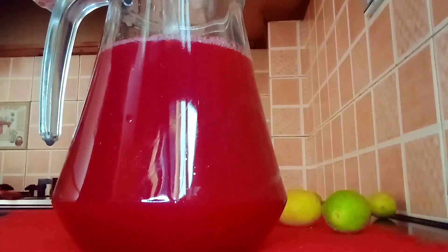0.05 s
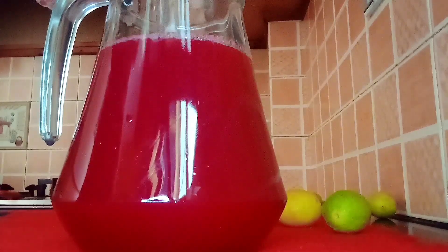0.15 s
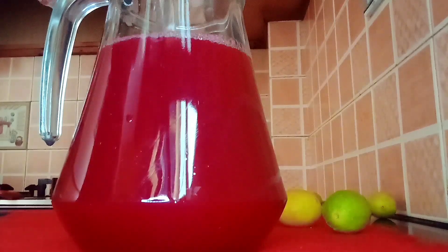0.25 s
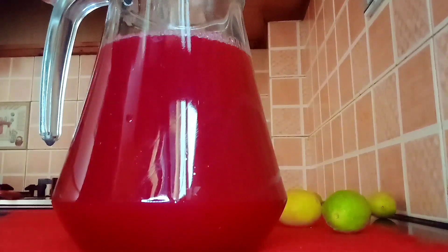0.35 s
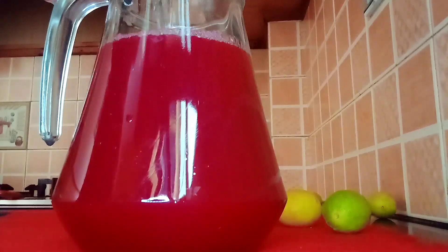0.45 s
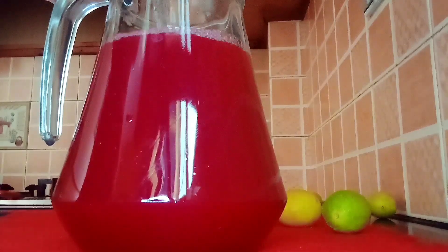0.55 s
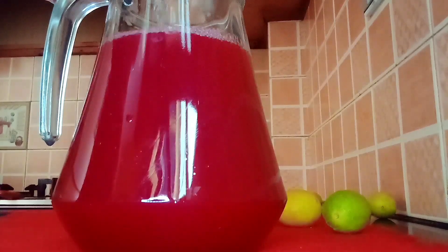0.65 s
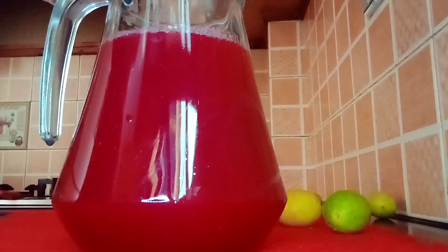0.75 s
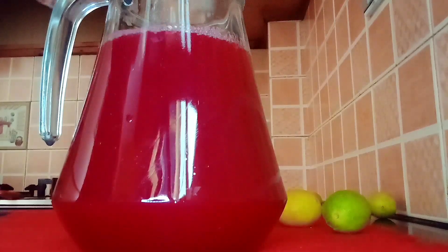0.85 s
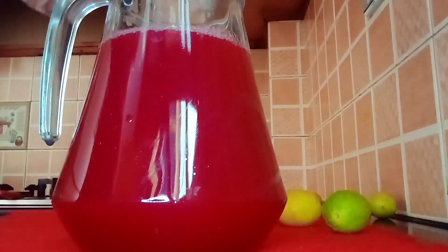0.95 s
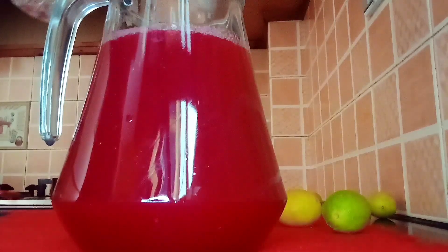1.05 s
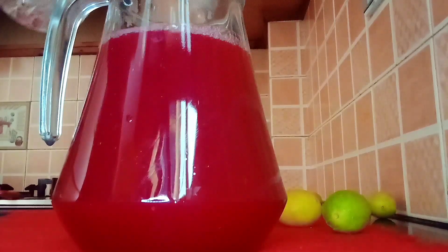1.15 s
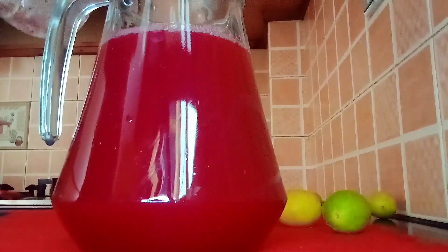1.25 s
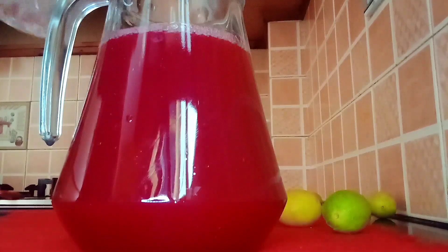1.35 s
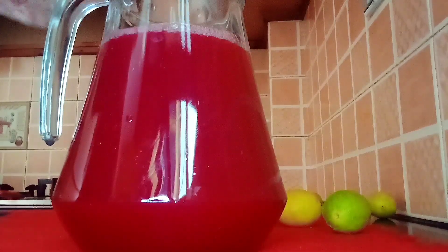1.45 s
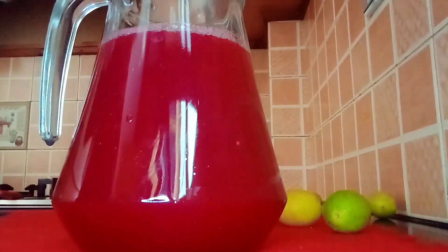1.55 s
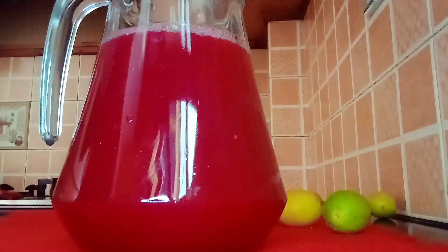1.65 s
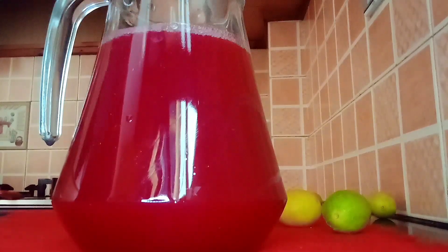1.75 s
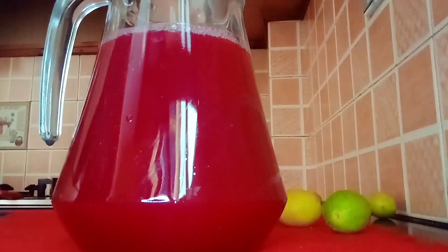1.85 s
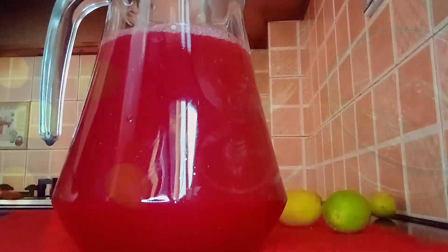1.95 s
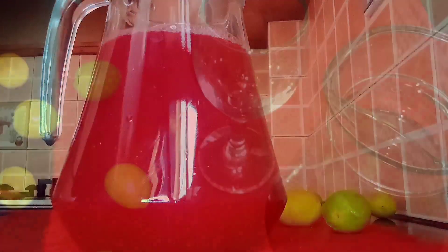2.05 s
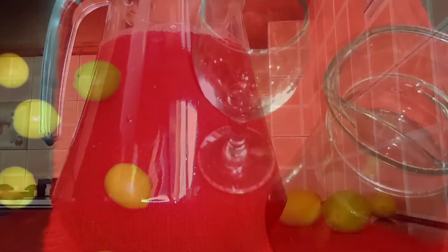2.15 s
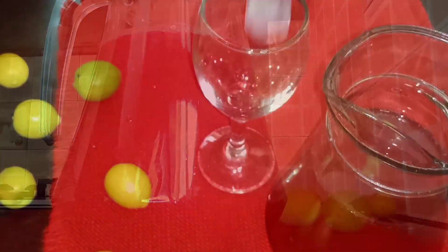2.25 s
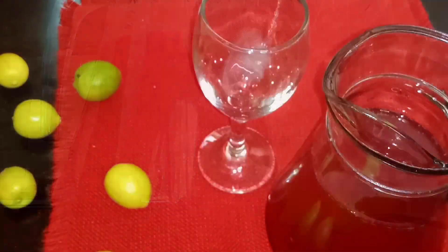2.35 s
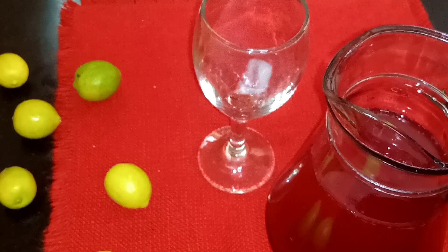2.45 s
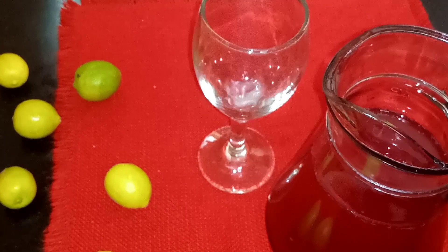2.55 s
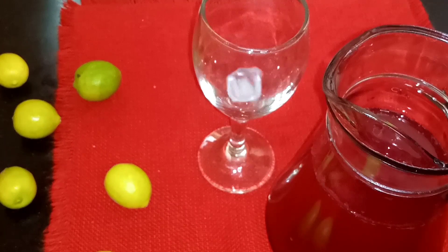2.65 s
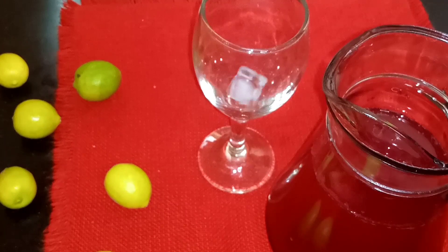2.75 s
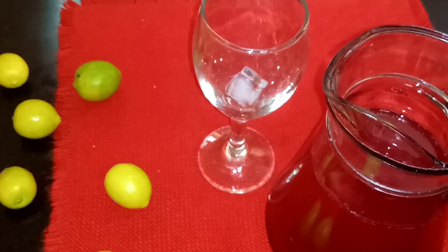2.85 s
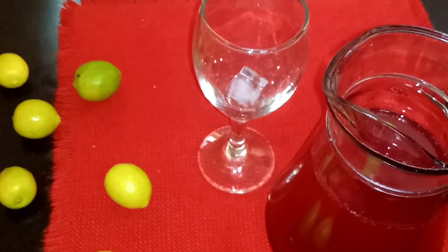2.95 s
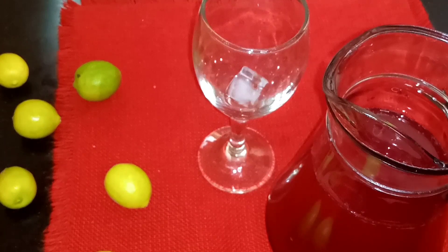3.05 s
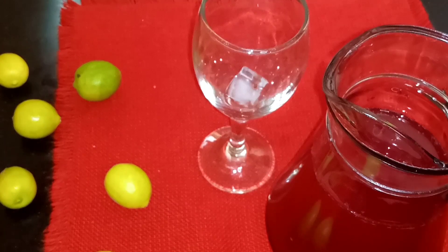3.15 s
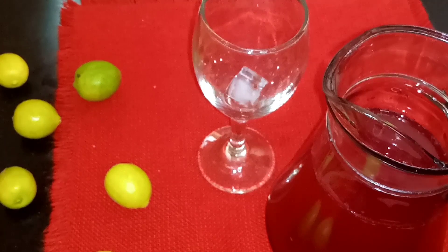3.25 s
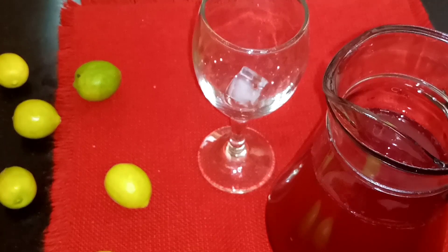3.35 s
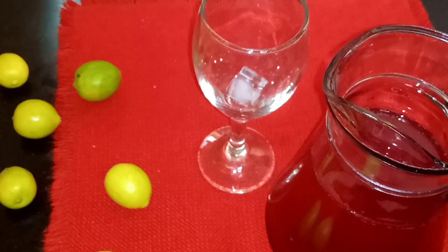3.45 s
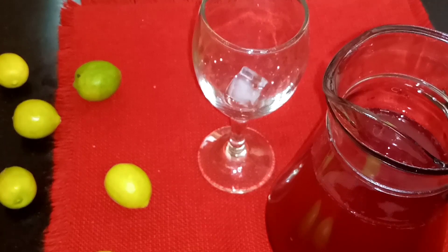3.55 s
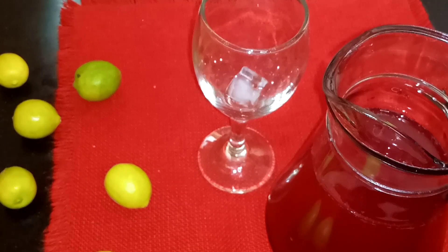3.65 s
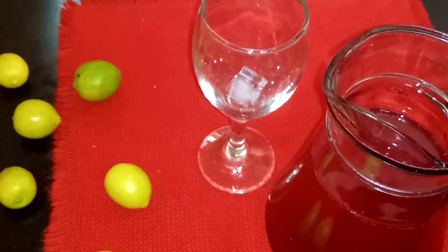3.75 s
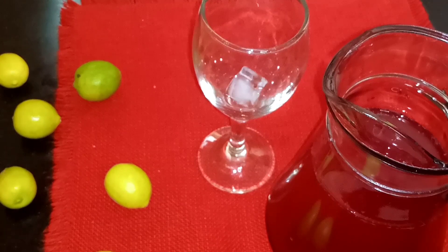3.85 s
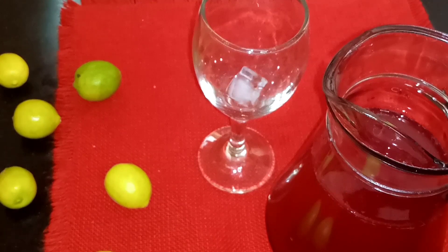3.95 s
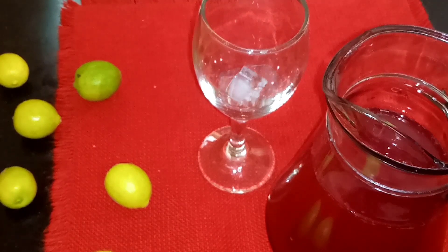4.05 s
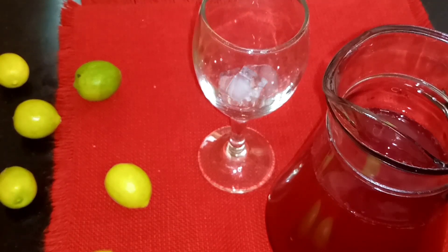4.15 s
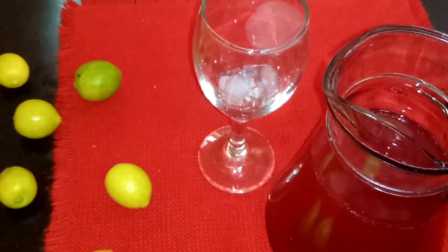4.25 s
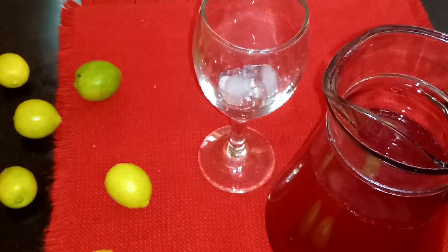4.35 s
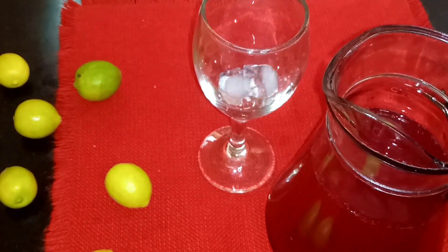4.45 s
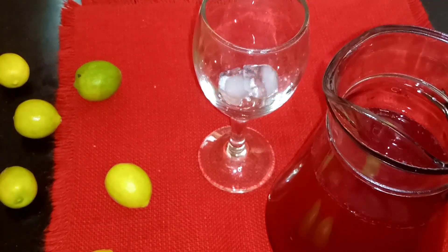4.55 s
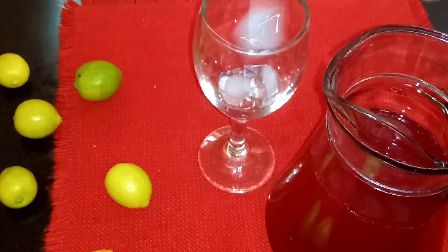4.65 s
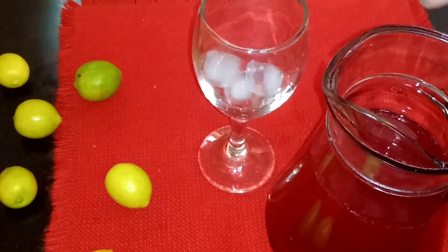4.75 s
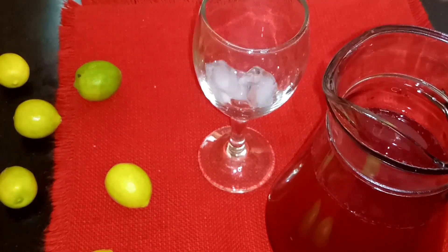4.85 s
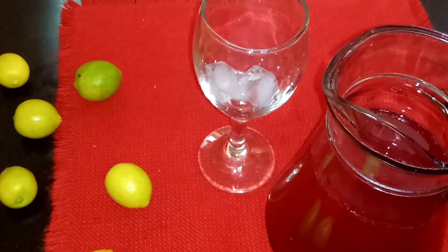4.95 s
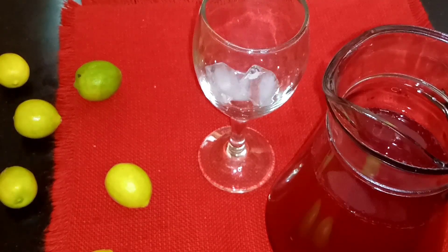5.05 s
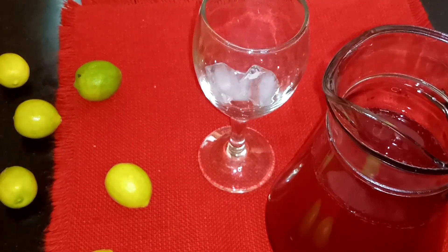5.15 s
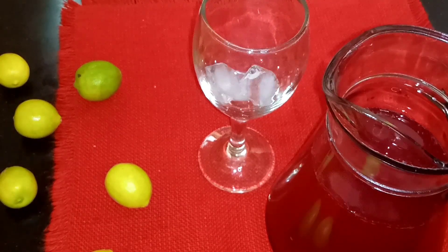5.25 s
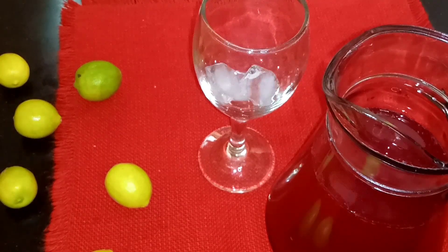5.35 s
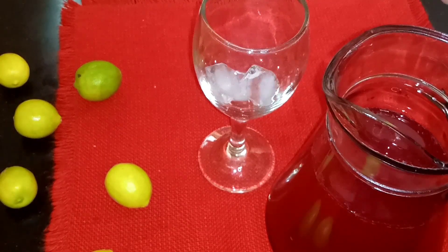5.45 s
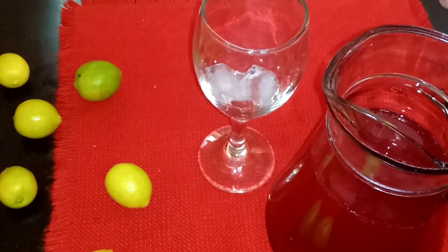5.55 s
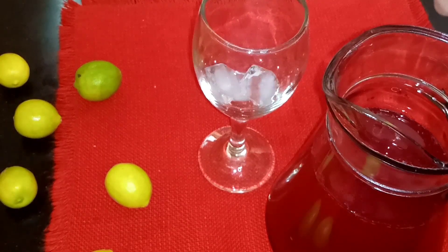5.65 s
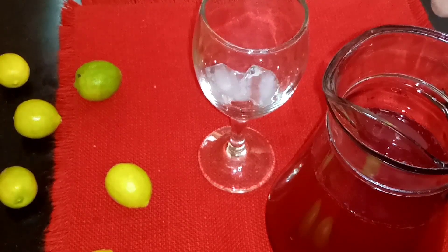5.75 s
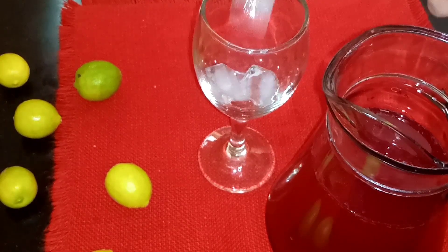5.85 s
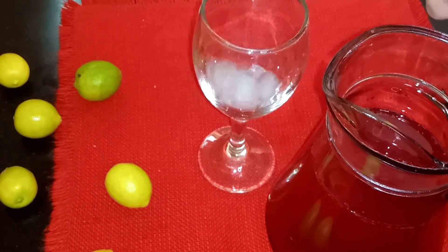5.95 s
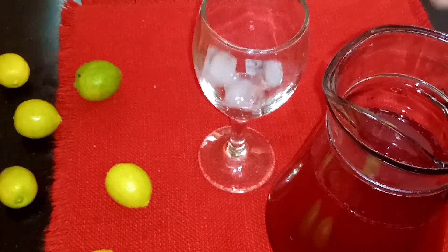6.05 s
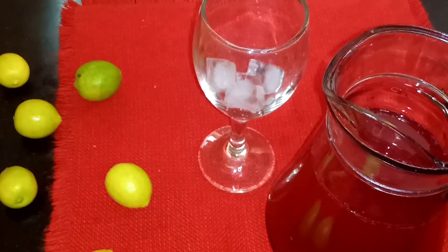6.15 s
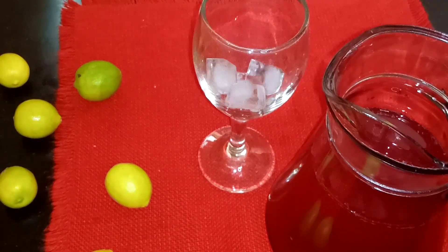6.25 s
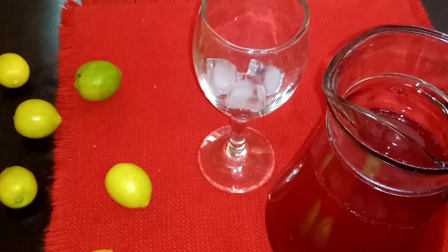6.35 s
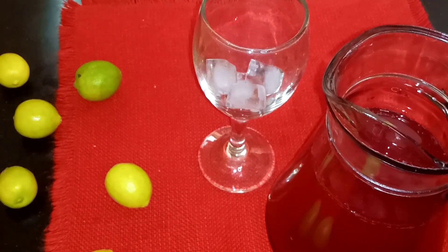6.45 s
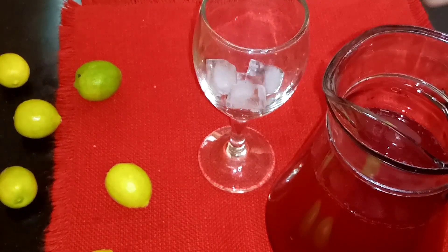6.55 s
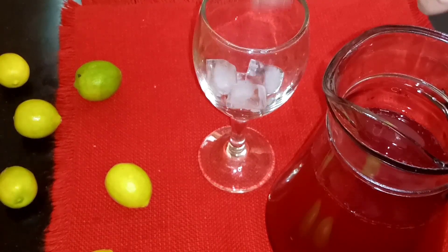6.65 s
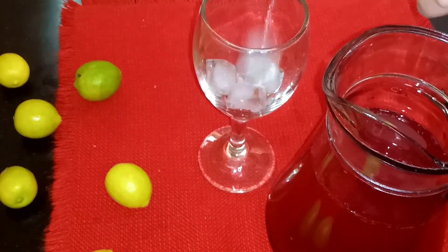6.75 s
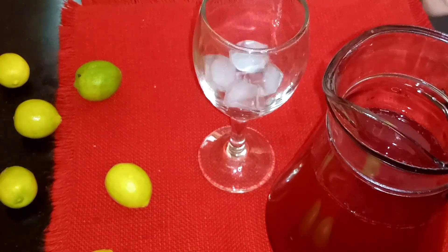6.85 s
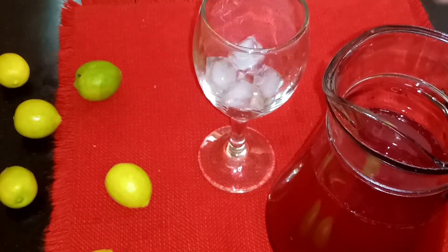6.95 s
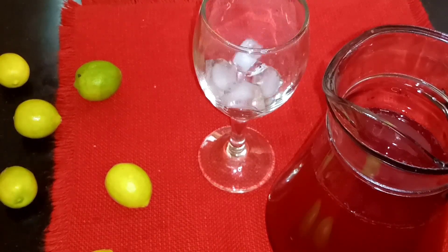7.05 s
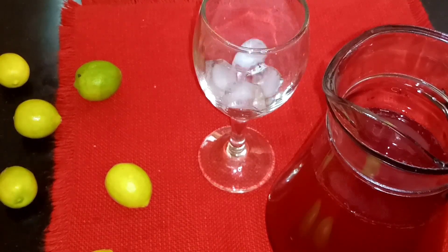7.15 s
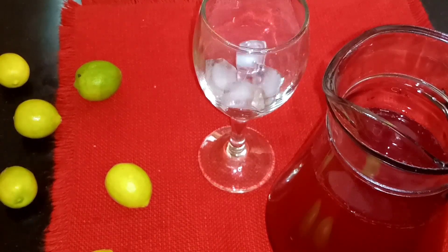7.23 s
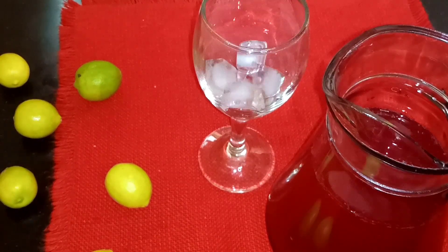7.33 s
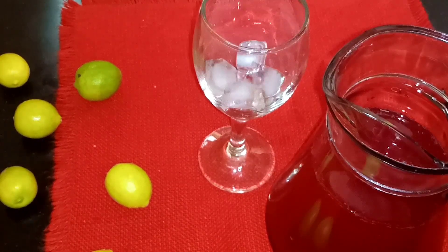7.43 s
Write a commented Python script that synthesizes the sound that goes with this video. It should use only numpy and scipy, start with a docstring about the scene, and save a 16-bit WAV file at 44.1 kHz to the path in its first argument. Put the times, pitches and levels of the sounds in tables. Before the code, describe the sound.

A close, clear kitchen scene with very quiet air and short, bright reflections from tiles. From about 0.2 s juice runs into a nearly full glass pitcher: round, mid-pitched bubbles gurgle in quick succession, thin spray hisses and spatters, and a faint hum climbs as the neck fills. The flow eases near 0.9 s, surges around 1.1 s and dies by 1.4 s. Near silence follows, with faint nudges near 1.9 s. At 2.3 s an ice cube strikes the stemmed glass, bouncing in hard, ringing clicks to 2.65 s, with smaller knocks around 3 s. More cubes clatter at 4.2-4.3 s, the ring cutting off abruptly near 4.4 s, then at 4.6-4.85 s. Lighter ticks and slides come at 5.1-5.7 s, strong cracks at 6.0 and 6.8 s, and small settling clinks until about 7.5 s. Barely audible dull thuds lie beneath.

```python
"""Juice is heard first, running into a nearly full glass pitcher: entrained air sings as bubbles,
spray spatters as short grains, and a tone rises in pitch as the air space in the neck shrinks.
Ice cubes then drop one by one into a stemmed glass: brittle clicks, decaying modes of the bowl,
and runs of tiny ticks as they slide to rest. Soft thuds, nudges and faint hollow tones lie beneath.
Tiled walls add diffuse reflections, and a limiter catches the hardest hits."""
import sys
import numpy as np
from scipy import signal
from scipy.fft import rfft, irfft, next_fast_len
from scipy.io import wavfile
from scipy.ndimage import uniform_filter1d, minimum_filter1d

SR = 44100
rng = np.random.default_rng(int(sys.argv[2]) if len(sys.argv) > 2 else 0)


def generate_wav(signal):
    """Clip the signal to [-1, 1] and save it as 16-bit WAV at the path in sys.argv[1]."""
    frames = np.transpose(np.atleast_2d(signal))
    scaled = np.clip(frames, -1, 1) * 32767
    pcm = np.round(scaled).astype(np.int16)
    wavfile.write(sys.argv[1], SR, pcm)


N = 330304
TIME = np.arange(N) / SR

# All levels are relative: each source and its reflections scale them further.
# Spectrum of the quiet kitchen air: [f/Hz, level/dB]
KITCHEN_COLOUR = [(25, -26.5), (50, -10), (95, 0), (300, -7), (600, -14.5), (1300, -17.5), (3000, -18.5),
                  (6200, -15.5), (9000, -23), (16000, -34)]
# Dull thuds: [t/s, level/dB, f/Hz, length/s]
THUDS = [(4.29, -44.5, 152, 0.065), (4.76, -40.5, 134, 0.081), (5.54, -44, 151, 0.069),
         (5.65, -43.5, 86, 0.091), (6.05, -42, 149, 0.17), (6.23, -37.5, 85.5, 0.097),
         (6.66, -43.5, 91, .1), (6.97, -46, 114.7, 0.069), (7.33, -41, 212, 0.17)]
# Faint hollow tones: [t/s, level/dB, f/Hz, length/s]
HOLLOW_TONES = [(3.18, -54.5, 398, 0.15), (3.34, -56, 760, 0.138), (3.42, -56.5, 381, 0.079),
                (6.44, -53, 607, 0.32)]

# The stream swells, eases, surges once more and stops, leaving foam:
# [t/s, bubbling level/dB, spray level/dB]
POUR_LEVELS = [(0, -52.5, -54), (.29, -44.5, -49.5), (.33, -30.5, -46.5), (.44, -34, -39),
               (.6, -25.5, -41.5), (.85, -32.5, -35), (1.0, -36, -38), (1.17, -26.5, -43.5),
               (1.37, -60, -60.5), (1.9, -100, -80)]
# Air resonance in the neck of the pitcher: [t/s, f/Hz, level/dB]
NECK_RESONANCE = [(0, 310, -83), (.3, 315, -76), (.45, 322.5, -46.5), (.8, 333.3, -45), (1.05, 373.7, -40),
                  (1.2, 418, -60), (1.35, 430.6, -86)]
# Big single bubbles: [t/s, level/dB, f/Hz]
BIG_BUBBLES = [(.211, -27, 913), (.318, -23.5, 904), (.403, -15, 873), (.434, -15.5, 834),
               (.564, -13.5, 790), (.584, -15, 816), (.604, -14, 792), (.620, -11.5, 758), (.656, -12, 798),
               (.730, -12.5, 793), (.811, -13, 877), (.875, -19, 1790), (.882, -24, 2060),
               (.995, -13.5, 6545), (1.025, -8.5, 796), (1.061, -13.5, 813), (1.065, -21.5, 2670),
               (1.131, -13.5, 839), (1.195, -18.5, 780), (1.220, -29, 537), (1.288, -25.5, 920),
               (1.447, -48.5, 880)]
# Spectrum of the small bubbles: [f/Hz, level/dB]
BUBBLING_COLOUR = [(400, -38), (560, -15.5), (680, -10), (800, 6), (960, -2.5), (1230, -14), (1450, -8),
                   (2100, -39.5), (2600, -16)]
# Spectrum of the spray: [f/Hz, level/dB]
SPRAY_COLOUR = [(1060, -17.5), (1800, -16), (2280, -17), (2640, -17), (4250, -14), (5100, -5.5),
                (5800, -10), (6710, -0.5), (7770, -11), (8670, -4), (12200, -16.5), (16000, -2.5)]
# Splashes of the stream: [t/s, level/dB]
SPLASHES = [(0.060, -36.5), (0.125, -35.5), (0.21, -37.5), (0.404, -35), (0.429, -27), (0.527, -21.5),
            (.675, -29), (0.749, -29.5), (.875, -36), (1.131, -32)]
SURGE_DB, SURGE_HZ = 2, 14  # rms wavering of the stream, and the rate where it is strongest
GLUG_CYCLES, GLUG_GLIDE = 66, .025  # cycles to fall 60 dB, and the rise-in-pitch coefficient

# Spectrum of ice cracks and scrapes: [f/Hz, level/dB]
ICE_COLOUR = [(350, -66.5), (600, -27), (894, -12), (1050, -17), (1350, -9.5), (1930, -12), (3040, -6),
              (4110, -4.5), (5630, -9.5), (6830, -8), (7830, -21), (8990, -18.5), (13600, -46.5),
              (16000, -30)]
# The clearest ice clicks: [t/s, level/dB, cube resonance f/Hz, body level/dB, top level/dB]
ICE_CLICKS = [(2.221, -34, 3680, -8, -7), (2.2527, -26.5, 3720, -16, -22), (2.3348, 1.5, 6340, -6.5, -16),
              (2.437, 1.5, 3240, -29, -9), (2.5744, -5.5, 5850, -35, -22), (2.582, 0.5, 6660, -35, -23),
              (2.6439, -1, 5360, -38, -24.5), (2.8669, -21, 4180, -40, -14), (2.992, -3.5, 3120, -3, -5),
              (3.013, -12, 3882, -22, -34), (3.0876, -12, 3850, -21.5, -21.5),
              (3.9694, -13.5, 4420, -21, -30.5), (4.137, -17, 3600, -19, -20), (4.1907, -3, 3990, -27, -20),
              (4.2331, 3.5, 4240, -23, -7), (4.2966, 1, 3560, -13.5, -3.5), (4.4583, -19.5, 4270, -22, -8),
              (4.5673, -21.5, 4550, -21.5, -12), (4.599, 1.5, 4330, -20.5, -0.5),
              (4.7137, -0.5, 6456, -5, -23), (4.801, -2.5, 3790, -25.5, -38.5),
              (4.8373, -7, 3300, -23.5, -13), (5.1486, -19.5, 4510, -20, -5), (5.3487, -10, 6860, -42, -29),
              (5.4141, -13.5, 4000, -21, -5), (5.5063, -11.5, 4230, -12, -17),
              (5.6848, -20, 5870, -25, -22.5), (5.874, -9.5, 6340, -19.5, -17),
              (5.9017, -14.5, 4166, -15, -18), (5.9911, 4.5, 3730, -22.5, -30),
              (6.012, -1.5, 6010, -14, -7), (6.1019, -8, 3720, -24.5, -43), (6.2542, -9, 6400, -17, -5.5),
              (6.3592, -16.5, 4170, -19, -31), (6.3789, -14.5, 4340, -21, -12.5),
              (6.453, -22.5, 4140, -9, -6), (6.542, -11, 4090, -23.5, -7), (6.6173, -17.5, 6502, -5, -2),
              (6.8089, 5.5, 6030, -15.5, -15.5), (6.8798, 3.5, 4320, -29.5, -23),
              (7.012, -8.5, 3450, -12, -15), (7.0778, -11.5, 3530, -26, -20.5),
              (7.257, -11.5, 6830, -25, -16), (7.3191, -18, 3150, -43.5, -14),
              (7.364, -16.5, 4500, -30, -3), (7.3975, -10.5, 4400, -17.5, -9),
              (7.4325, -10, 6830, -31, -22), (7.4704, -10, 4400, -13, -9)]
# Blows on the bowl; where a cube lands sets what rings: [t/s, air in the bowl level/dB,
# first, second, third wall mode level/dB, highest modes level/dB]
BOWL_BLOWS = [(2.338, -25, -16, -11.5, -10, -26.5), (2.435, -19, -29, -21.5, -47, -20.5),
              (2.580, -29, -33, -62, -57, -35.5), (2.645, -35.5, -32, -49, -58, -33),
              (4.299, -19.5, -13.5, -2.5, -7.5, -29), (4.715, -41, -13.5, -19.5, -8, -32),
              (4.772, -19, -20.5, -20, -31, -28), (4.85, -35.5, -37, -17.5, -22.5, -38.5),
              (5.991, -19, -22.5, -23, -18.5, -27.5), (6.811, -29, -41, -40.5, -31, -32),
              (6.882, -29, -32.5, -41.5, -39, -38.5), (7.010, -30.5, -30.5, -18.5, -55, -30.5),
              (7.258, -44.5, -52, -30.5, -37, -50)]
# Frequencies to which the five levels of a blow belong: [f/Hz]
FAMILY_HZ = [800, 1360, 3350, 6200, 13000]
# Modes of the glass: [f/Hz, level/dB, t60/s before the sustain factor]
GLASS_MODES = [(730, -7, .1), (790, -2, .17), (870, -2, .2), (945, -5, .14), (1345, -7, .25),
               (1363, -2, .65), (2970, -23, .5), (3330, -11, .4), (3351, -3, .75), (4725, -18, .4),
               (5420, -14, .35), (6203, 0, .45), (8087, -12, .32), (9432, -5, .28), (9645, -11, .28),
               (12692, -7, .24), (12930, -8, .24), (14180, -7, .22), (14548, -4, .28), (14685, -3, .28)]
# Soft, damped nudges of the glass: [t/s, level/dB]
NUDGES = [(1.926, -37.5), (1.98, -41.5), (3.156, -29.5), (3.361, -53), (3.486, -48.5), (3.558, -41),
          (3.614, -36), (3.802, -44.5), (5.525, -33), (5.551, -25), (5.83, -40)]
# Bouts of cubes sliding against each other: [t/s, length/s, level/dB]
SLIDES = [(2.079, 0.018, -50.5), (2.337, 0.28, -29), (2.889, 0.2, -41), (3.928, 0.33, -42),
          (4.211, 0.17, -27), (4.722, 0.15, -21.5), (5.146, 0.057, -33), (5.31, 0.045, -46),
          (5.366, .18, -29.5), (5.985, 0.13, -20.5), (6.34, 0.067, -42.5), (6.527, 0.15, -37.5),
          (6.884, .17, -27.5), (7.226, 0.055, -36), (7.327, 0.18, -39)]
RING_STOP_S = 4.437  # cube sound begun earlier, reflections included, stops dead here
SLIDE_ATTACK_S, SETTLE_DB_PER_S = 0.011, 182.5  # quick onset, and decay as the cubes come to rest
SLIDE_TICKS_PER_S = 350  # mean rate of contacts
JOSTLE_DB, JOSTLE_SPREAD_DB = 14, -1  # click level above the bout's level, and its random range
JOSTLE_HZ, JOSTLE_BODY_DB, JOSTLE_TOP_DB = 4540, -20.5, -22  # central pitch, click colour

TOP_HZ = 15900  # upper band edge of the output


def undb(db):
    """Decibels are a logarithmic measure of amplitude; this inverts it."""
    return 10 ** (np.asarray(db) / 20)


def unit(x):
    """Normalisation to unit root-mean-square amplitude."""
    return x / np.sqrt(np.mean(x ** 2) + 1e-18)


def steady(x, size=3500):
    """Automatic gain: dividing by the running rms over about a twelfth of a second evens the level."""
    power = np.abs(uniform_filter1d(x ** 2, size))
    return x / np.sqrt(power + np.mean(power) / 10 ** 2)


def curve(rows, axis):
    """Linear interpolation in time of one column of a table."""
    rows = np.array(rows)
    return np.interp(TIME, rows[:, 0], rows[:, axis])


def colour(x, points):
    """Minimum-phase filtering through [f/Hz, level/dB] points: folding the cepstrum makes it causal."""
    size = next_fast_len(2 * len(x))
    hz, db = np.array(sorted(points), float).T
    f = np.maximum(np.arange(size // 2 + 1) * SR / size, 1)
    log_gain = np.log(undb(np.interp(np.log(f), np.log(hz), db)))
    cepstrum = irfft(log_gain, size)
    cepstrum[1:size // 2] *= 2
    cepstrum[size // 2 + 1:] = 0
    return irfft(rfft(x, size) * np.exp(rfft(cepstrum)), size)[:len(x)]


def span(length):
    """Uniform sampling of a time axis of the given length in seconds."""
    return np.arange(int(length * SR)) / SR


def fade(t, t60):
    """Exponential decay: the amplitude falls 60 dB in t60 seconds."""
    return np.exp(-np.log(1000) * t / t60)


def swell(t, rise):
    """Gradual onset: a smooth build-up on the scale of rise seconds."""
    return 1 - np.exp(-(t / rise) ** 2)


def add(out, s, x):
    """Superposition: mix x into out from time s."""
    i = int(np.clip(s * SR, 0, N - 1))
    out[i:i + len(x)] += x[:N - i]


def tiles(x, wet_db, t60):
    """Diffuse reverberation from tiled walls, as a decaying noise response; the top dies sooner."""
    t = span(0.81)
    low = colour(rng.standard_normal(len(t)), [(200, -3.0), (6500, -6.5), (10000, -23.5)])
    low = low * fade(t, t60)
    high = colour(rng.standard_normal(len(t)), [(5000, -12.0), (10000, -1.0)])
    high = high * fade(t, 0.2)
    onset = 1 - np.exp(-t / 0.00067)
    response = unit((low + high) * onset) / np.sqrt(len(t))  # unit energy
    return x + undb(wet_db) * signal.fftconvolve(x, response)[:N]


def kitchen_air():
    """Stationary background noise: random pressure shaped by a fixed spectrum."""
    return undb(-60.0) * unit(colour(rng.standard_normal(N), KITCHEN_COLOUR))


def thuds_and_tones():
    """Frequency modulation: soft sines under a half-sine swell waver randomly in pitch."""
    out = np.zeros(N)
    for rows, waver in ((THUDS, .25), (HOLLOW_TONES, .025)):
        for s, db, hz, length in rows:
            t = span(length)
            drift = unit(uniform_filter1d(rng.standard_normal(len(t)), size=300))
            cycles = hz * np.cumsum(1 + waver * drift) / SR
            envelope = np.sin(np.pi * t / length)
            add(out, s, undb(db) * envelope * np.sin(2 * np.pi * cycles))
    return out


def bubble(hz, t60, glide):
    """Bubble resonance: a damped sine builds over a cycle and climbs as it nears the surface."""
    t = span(t60)
    tone = np.sin(2 * np.pi * hz * t * (1 + glide * t / t60))
    return tone * fade(t, t60) * swell(t, 1 / hz)


def grains(start, end, count, lo_hz, hi_hz, cycles, glide, spread_db):
    """Random superposition: small ringing grains at random times, pitches and sizes."""
    out = np.zeros(N)
    for when, pitch, size in rng.random((count, 3)):
        hz = lo_hz * (hi_hz / lo_hz) ** pitch
        gain = undb(spread_db * size ** 2)
        add(out, start + when * (end - start), gain * bubble(hz, cycles / hz, glide))
    return out


def neck():
    """Cavity resonance: the shrinking air space hums ever higher, its amplitude randomly modulated."""
    wobble = unit(colour(rng.standard_normal(N), [(38, -3.5), (110, -38.5), (400, -102)]))
    cycles = np.cumsum(curve(NECK_RESONANCE, axis=1)) / SR
    level = undb(curve(NECK_RESONANCE, axis=2))
    return wobble * np.sin(2 * np.pi * cycles) * level * (TIME < 1.5)


def pour():
    """Air entrainment: the stream drags in air, so bubbles sing, spray spatters and the neck hums."""
    small_bubbles = grains(0, 1.9, 1800, 444.0, 2575, 26, 0.06, 22)
    bubbling = steady(colour(small_bubbles, BUBBLING_COLOUR))
    spatter = unit(grains(0, 1.7, 6000, 1520, 13900, 14, 0.028, 9.6))
    pings = unit(grains(0, 1.9, 900, 1600, 8000, 70, 0.02, 29))
    spray = steady(colour(spatter + undb(3.0) * pings, SPRAY_COLOUR))
    out = bubbling * undb(curve(POUR_LEVELS, axis=1) - 2.5)
    out += spray * undb(curve(POUR_LEVELS, axis=2) - 2.06)
    surge_colour = [(SURGE_HZ / 2, -10), (SURGE_HZ, 0), (10 * SURGE_HZ, -60)]
    surge = unit(colour(rng.standard_normal(N), surge_colour))
    out *= undb(SURGE_DB * surge)
    out += neck()
    for s, db, hz in BIG_BUBBLES:
        add(out, s, undb(db) * bubble(hz, GLUG_CYCLES / hz, GLUG_GLIDE))
    return out


def splashes():
    """Impact on a liquid: the stream slaps the surface and throws a short noise burst of spray."""
    out, t = np.zeros(N), span(0.045)
    for s, db in SPLASHES:
        burst = rng.standard_normal(len(t)) * fade(t, 0.066) * swell(t, 0.0066)
        spray = colour(colour(burst, SPRAY_COLOUR), [(7000, 4.0), (14000, -13.0)])
        add(out, s, undb(db - 11) * unit(spray))
    return out


def ring(family_db, sustain):
    """Modal beating: ice leaning on the wall splits each mode of the struck bowl into a close pair."""
    out, t = 0, span(.8)
    for hz, db, t60 in GLASS_MODES:
        gain = undb(db + np.interp(np.log(hz), np.log(FAMILY_HZ), family_db))
        main, twin = hz * (1 + np.array([.0002, .002]) * rng.standard_normal(2))
        pair = 0.83 * np.sin(2 * np.pi * main * t) + 0.34 * np.sin(2 * np.pi * twin * t)
        out = out + gain * pair * fade(t, t60 * sustain) * swell(t, 0.94 / hz)
    return out


def nudges():
    """Damped excitation: a soft push and rub blurs the modes, which die fast; a hollow tone leads."""
    out, t = np.zeros(N), span(0.17)
    for s, db in NUDGES:
        rub = rng.standard_normal(len(t)) * fade(t, 0.21)
        modes = ring([-14.5, -3.5, -5, -9.5, -26], 0.029)
        walls = signal.fftconvolve(rub, modes)[:len(t)]
        hollow = bubble(780 * (1 + 0.024 * rng.standard_normal()), 0.072, .02)
        add(out, s, undb(db - 16) * unit(walls))
        add(out, s, undb(db - 1) * hollow)
    return out


def bout(start, length):
    """Frictional decay: the envelope of one slide rises quickly, holds, then falls steadily in dB."""
    age = np.maximum(TIME - start, 0)
    settling = undb(-SETTLE_DB_PER_S * np.maximum(age - length, 0))
    return swell(age, SLIDE_ATTACK_S) * settling


def slide(bouts):
    """Stick-slip friction: wet cubes shift against each other in a run of tiny dry ticks."""
    struck = rng.random(N) < SLIDE_TICKS_PER_S / SR
    sizes = undb(5.7 * rng.standard_normal(N).clip(-2, 2))
    contacts = struck * sizes * rng.choice([-1, 1], N)
    t = span(.02)
    wall = rng.standard_normal(len(t)) * fade(t, 0.015)  # each tick rattles briefly round the bowl
    scrape = steady(colour(signal.fftconvolve(contacts, wall)[:N], ICE_COLOUR))
    catch = unit(colour(rng.standard_normal(N), [(25, -4.5), (150, -44.5)]))  # stick, then slip
    motion = sum(undb(db) * bout(s, length) for s, length, db in bouts)
    return scrape * motion * undb(2.6 * catch - 6.0)


def jostles(bouts):
    """Random impacts: two small knocks during each slide, as rows like those of ICE_CLICKS."""
    rows = []
    for s, length, db in bouts:
        for when, size, pitch in rng.uniform(-1, 1, size=(2, 3)):
            moment = s + length * (1 + when) / 2
            level = db + JOSTLE_DB + JOSTLE_SPREAD_DB * size
            hz = JOSTLE_HZ * 2 ** (pitch / 2)  # within half an octave either way
            rows.append((moment, level, hz, JOSTLE_BODY_DB, JOSTLE_TOP_DB))
    return rows


def clicks(rows):
    """Brittle impact: each contact is a noisy crack, a brief cluster of cube modes, uneven chatter."""
    out, t = np.zeros(N), span(0.18)
    for s, db, hz, body_db, top_db in rows:
        chatter = undb(3.7 * unit(uniform_filter1d(rng.standard_normal(len(t)), size=130)))
        shape = fade(t, 0.017) + undb(-25.5) * fade(t, 0.37) * chatter
        crack = unit(colour(rng.standard_normal(len(t)) * shape, ICE_COLOUR))
        detuning = np.outer([0, .04, .12, .3], rng.standard_normal(3)).reshape(-1, 1)
        modes = hz * np.exp(detuning)
        cluster = np.sin(2 * np.pi * (modes * t + rng.random(modes.shape))).sum(0)
        note = unit(cluster * fade(t, 0.036))
        tint = [(200, -24.5), (1600, body_db + 16.5), (4500, 1.5),
                (9500, top_db + 18.5), (12500, top_db + 19)]
        hit = colour((crack + 0.918 * note) * swell(t, 0.00048), tint)
        add(out, s, undb(db - 27.5) * unit(hit))
    return out


def glass(rows):
    """Modal excitation: every blow rings the same modes of the bowl, in a different mix."""
    out = np.zeros(N)
    for s, *family_db in rows:
        add(out, s, ring(family_db, 0.74))
    return out


def cubes(start, end):
    """Superposition of contacts beginning in [start, end): clicks, ringing, slides, reflections."""
    tables = (ICE_CLICKS, BOWL_BLOWS, SLIDES)
    hits, blows, bouts = ([row for row in table if start <= row[0] < end] for table in tables)
    clicking = tiles(clicks(hits + jostles(bouts)), -4.0, 0.4)
    ringing = tiles(glass(blows), -7, 0.52)
    sliding = tiles(slide(bouts), -3, 0.34)
    return clicking + ringing + sliding


def scene():
    """Linear superposition: the pour, then the cubes, over the quiet air of the kitchen."""
    air = kitchen_air()
    juice = tiles(pour() + splashes(), -4.5, 0.31)
    settling = tiles(nudges(), 0.46, 0.3)
    drops = cubes(0, RING_STOP_S) * (TIME < RING_STOP_S) + cubes(RING_STOP_S, np.inf)
    return (juice + drops + settling + thuds_and_tones() + air)[None]


def record(dry):
    """Peak limiting and band limiting: a fast gain holds hits at full scale, then the top is cut."""
    needed = 1 / np.maximum(np.abs(dry), 1)
    gain = uniform_filter1d(minimum_filter1d(needed, size=90), size=45)
    top_cut = signal.ellip(10, .2, 70, TOP_HZ, fs=SR, output="sos")
    return signal.sosfilt(top_cut, dry * gain)


dry = scene()
out = record(dry)
generate_wav(out)
```